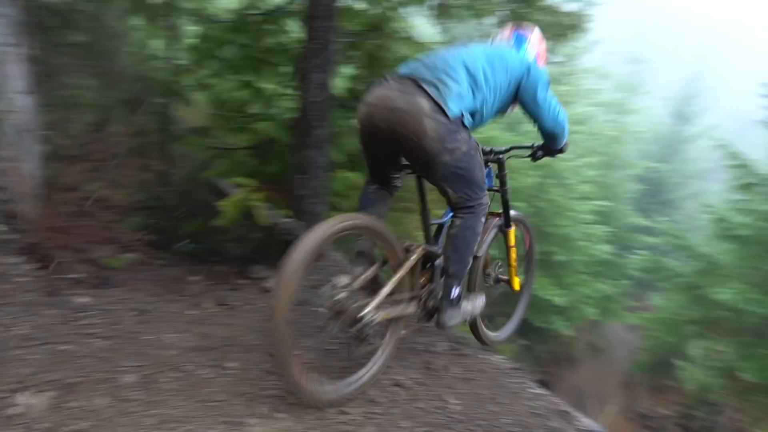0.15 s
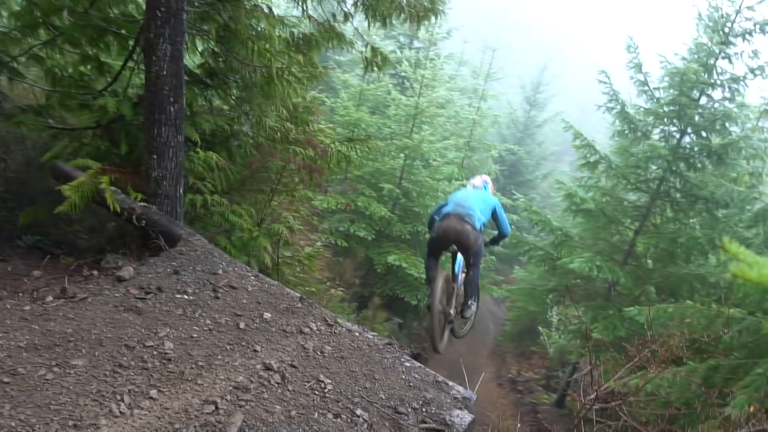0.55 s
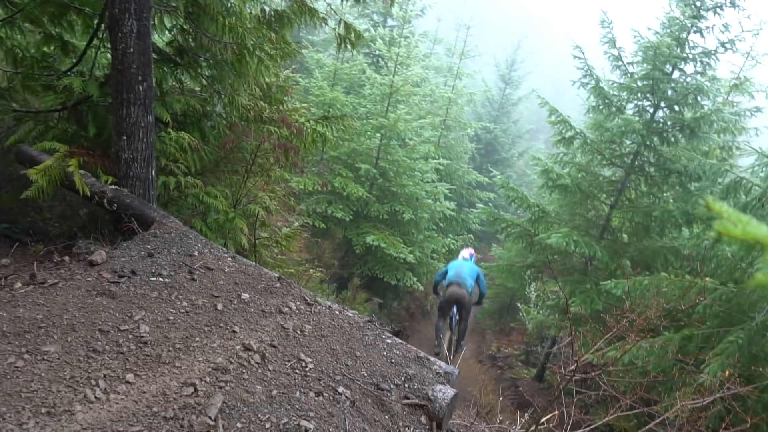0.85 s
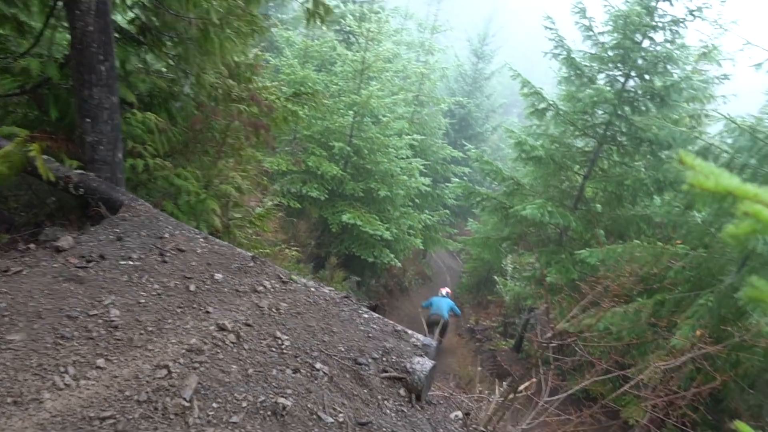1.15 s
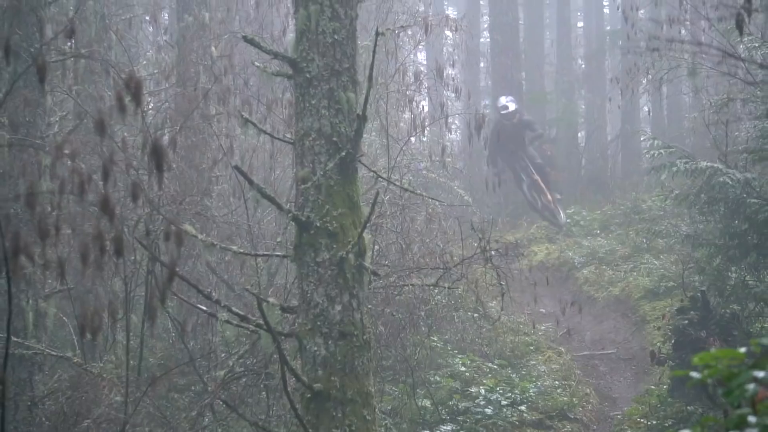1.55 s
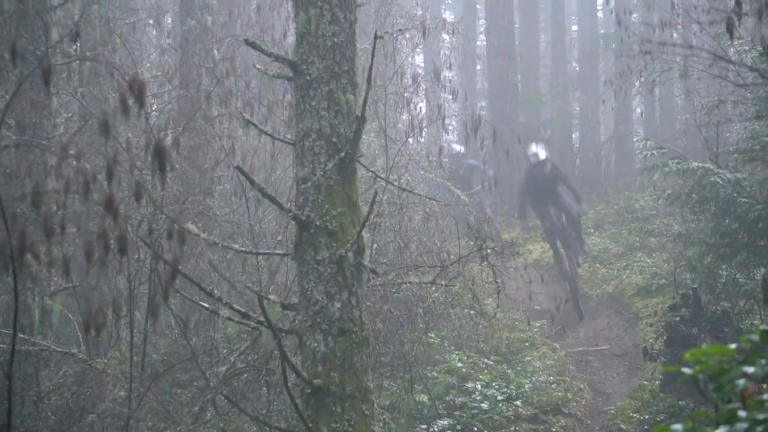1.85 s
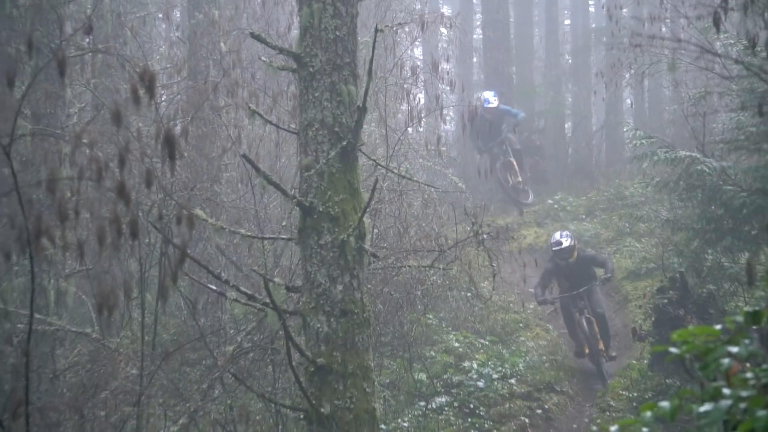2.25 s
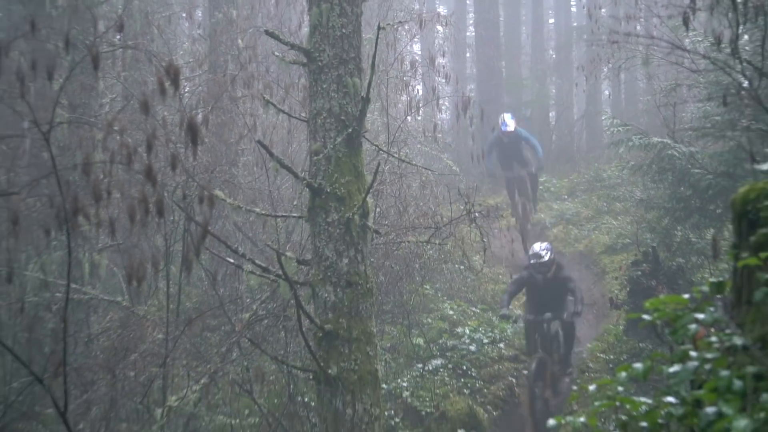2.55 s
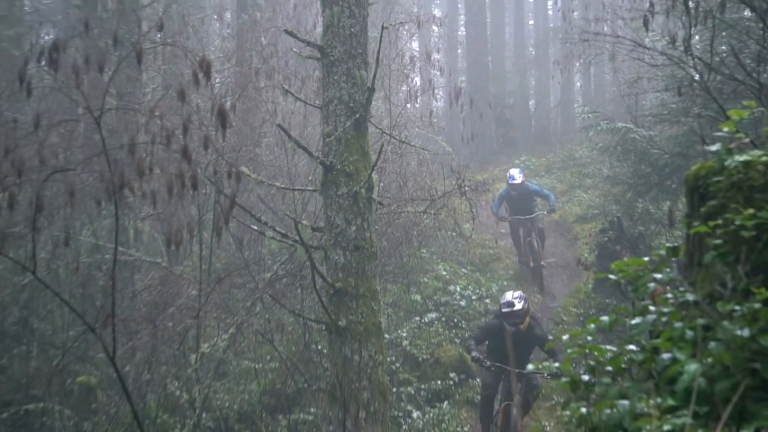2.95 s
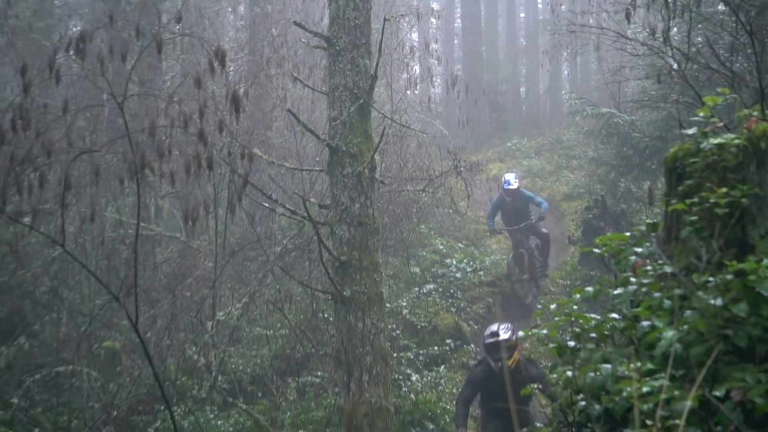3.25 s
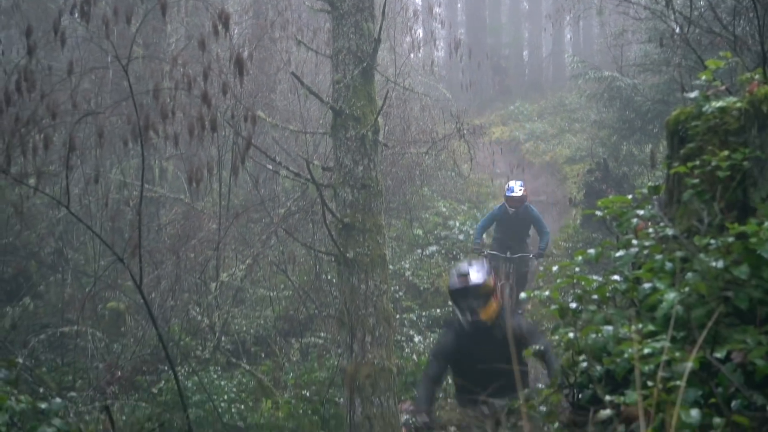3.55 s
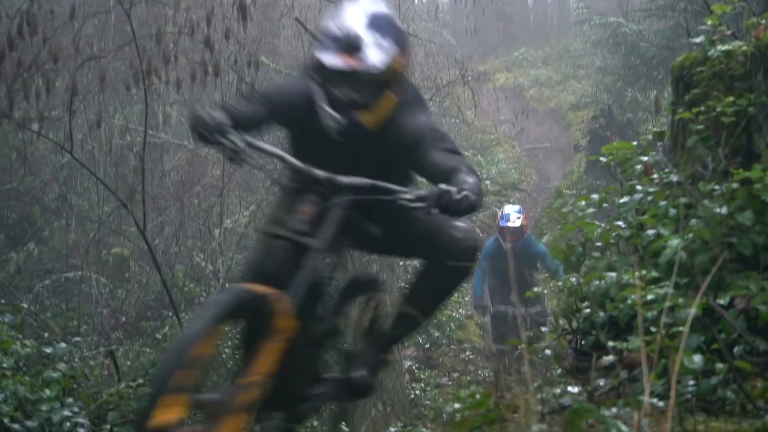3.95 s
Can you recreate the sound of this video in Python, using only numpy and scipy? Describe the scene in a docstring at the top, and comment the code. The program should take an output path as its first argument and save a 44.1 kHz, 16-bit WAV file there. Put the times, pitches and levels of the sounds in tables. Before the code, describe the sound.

On a wet forest trail, a close burst of tyre noise gives way to the ratcheting buzz of a coasting mountain bike in the air. The wheels land with a knock and a patter of earth. After a brief lull, two bikes approach with gritty, muddy rolling, low thuds and irregular chain rattles that echo briefly. Their high freehub whirr swells in spells as they near the microphone.

```python
"""A wet forest trail with mountain bikes. One rolls past, leaves a jump with its freehub buzzing and
lands, wheel after wheel. Then two riders come down a muddy track toward the microphone: knobbly tyres
scrub mud and crunch grit, wheels thud over roots, chains slap the frames, and the hubs ring louder
as they near, pawls snapping over ratchet teeth. Trunks scatter the knocks back as short echoes."""
import sys
import numpy as np
from scipy import signal
from scipy.fft import rfft, irfft, next_fast_len
from scipy.io import wavfile
from scipy.ndimage import map_coordinates

SR = 44100
rng = np.random.default_rng(int(sys.argv[2]) if len(sys.argv) > 2 else 0)


def master(y):
    """Save y as 16-bit WAV."""
    cut = np.clip(np.atleast_2d(y).T, -1, 1)
    pcm = np.round(cut * 32767)  # scale
    wavfile.write(sys.argv[1], SR, pcm.astype(np.int16))


N = 180631
TIME = np.arange(N) / SR
HZ = np.fft.rfftfreq(N, 1 / SR)
PASS_S, TAKE_OFF_S, LANDING_S = 0.023, .24, 1.172  # the first bike's cues
LIFT_S, DIG_RISE_S = 0.083, 0.021  # how long tyres take to leave the ground, and to bite into it


def gain_of(db):
    """Decibels to amplitude."""
    return 10 ** (np.asarray(db) / 20)


def unit_rms(x):
    """Scales to unit rms."""
    return x / np.sqrt(np.mean(x ** 2) + 1e-20)


def at_hz(points, hz):
    """Reads a spectrum table on a log-frequency axis."""
    f, value = np.transpose(points)
    return np.interp(np.log(hz + 1), np.log(f), value)


def curve(rows):
    """Reads a time table at every sample."""
    return np.interp(TIME, *np.transpose(rows))


def ramp(s, length):
    """Goes from 0 to 1 over a length of time centred on s."""
    return np.clip((TIME - s) / length + .5, 0, 1)


def swell(s, half_length):
    """A smooth rise and fall around s."""
    return np.exp(-((TIME - s) / half_length) ** 2)


def add(mix, s, sound):
    """Mixes a sound in at time s."""
    part = mix[:, max(round(s * SR), 0):][:, :sound.shape[-1]]
    part += sound[..., :part.shape[1]]


def colour(x, points):
    """EQ through points of frequency in Hz and gain in dB."""
    return irfft(rfft(x) * gain_of(at_hz(points, HZ)), N)


def wobble(hz):
    """Random modulation of unit rms, up to about hz."""
    return unit_rms(irfft(rfft(rng.standard_normal(N)) / (1 + (HZ / hz) ** 4), N))


def grains(per_s, wash):
    """Clicks of uneven size over a smooth wash of countless tiny ones."""
    sizes = gain_of(4 * np.minimum(rng.exponential(1, N), 3))
    clicks = sizes * (rng.random(N) < per_s / SR)
    return unit_rms(clicks * rng.uniform(-0.82, 1, (2, N))) + wash * rng.standard_normal((2, N))


def resonate(x, rings, wander_hz):
    """Steep resonances of a turning wheel, each drifting at random in pitch; unit rms."""
    size = next_fast_len(N)
    spectrum, f, out = np.fft.fft(x, size), np.fft.fftfreq(size, 1 / SR), 0
    for hz, width, db in rings:
        band = np.fft.ifft(spectrum * gain_of(db) / (1 + (2 * (f - hz) / width) ** 4))[:, :N]
        drift = np.interp(TIME, np.linspace(0, TIME[-1], 60), rng.standard_normal(60))
        out = out + (band * np.exp(2j * np.pi * np.cumsum(wander_hz * drift) / SR)).real
    return unit_rms(out)


def crossfade():
    """0 while the first bike is heard, 1 for the two riders."""
    return ramp(1.452, length=.02)


def first_bike_gain(closest_m=0.86, speed_m_per_s=10.46):
    """One over the distance of the bike that passes and flies off."""
    return (1 - crossfade()) / np.hypot(closest_m, speed_m_per_s * (TIME - PASS_S))


def riders_gain():
    """One over the distance of the two riders coming down."""
    # Their approach. Each row: time in seconds, distance in metres.
    approach = [(1.65, 34.7), (2.3, 12.1), (2.7, 16.2), (3.3, 10.5), (4.05, 7.6)]
    return crossfade() / curve(approach)


def spread(pair):
    """Two unrelated signals become left and right: near mono in the bass, wide in the treble."""
    # Stereo width. Each row: frequency in Hz, correlation of left and right.
    likeness = [(60, .999), (250, .97), (600, .89), (1400, .83), (3100, .62), (6800, .47), (15000, .44)]
    # Stereo balance. Each row: frequency in Hz, left minus right in dB.
    balance = [(600, 0), (1300, -1.5), (2400, -1.7), (5000, -1.2), (15000, -2.8)]
    mid, side = rfft(pair)
    same, lean = np.clip(at_hz(likeness, HZ), -1, 1), gain_of(at_hz(balance, HZ) / 2)
    side = side * np.sqrt((1 - same) / (1 + same))
    return irfft(np.array([(mid + side) * lean, (mid - side) / lean]), N)


def forest(x):
    """Trunks scatter the sound back as sparse echoes, the top end dying first."""
    # Decay among the trees. Each row: frequency in Hz, t60 in seconds.
    decay = [(100, 0.35), (500, 0.97), (2000, 0.39), (5000, 0.8), (15000, 0.2)]
    taps = rng.standard_normal((2, SR)) * (rng.random((2, SR)) < 2500 / SR)
    hz, t, bands = signal.stft(taps, SR, nperseg=256)
    envelope = gain_of(-60 * t / at_hz(decay, hz)[:, None]) * (1 - np.exp(-t / 0.0018))
    tail = signal.istft(bands * envelope, SR, nperseg=256)[1]
    return signal.fftconvolve(x[:1], tail / np.linalg.norm(tail[0]), axes=1)[:, :N]


def draught(arrives_s=.25, rise_db_per_s=165, fall_db_per_s=75):
    """The air dragged behind the first rider flutters on the microphone, then settles."""
    level_db = -39.5 - np.maximum(rise_db_per_s * (arrives_s - TIME), fall_db_per_s * (TIME - arrives_s))
    flutter_hz = 31 + 4 * wobble(hz=17)
    return gain_of(level_db) * np.sin(2 * np.pi * np.cumsum(flutter_hz) / SR)


def spray():
    """Crumbs of earth fly off the wheels at take-off and landing, and patter into the brush."""
    # The patter's EQ. Each row: frequency in Hz, gain in dB.
    patter_eq = [(600, -33), (2000, 0), (3800, 2.5), (5600, 3.5), (7500, -4.5), (11000, -9.5), (15500, -10)]
    thinning = gain_of(-3 * ramp(TAKE_OFF_S + 0.086, length=.15))
    trailing = gain_of(-35.5) * first_bike_gain() * ramp(0.094, length=.15) * thinning
    landing = gain_of(-35) * ramp(LANDING_S, DIG_RISE_S) * swell(LANDING_S, 0.27) * (1 - crossfade())
    return unit_rms(colour(grains(per_s=6900, wash=2.7), patter_eq)) * np.hypot(trailing, landing)


def thuds(earth_hz=68.7):
    """A wheel hits the ground: the earth gives a low thud and the tyre casing rings."""
    # Wheel strikes. Each row: start in seconds, thud level in dB, casing ring against the thud in dB.
    strikes = [(1.083, -33.5, -17), (1.125, -25.5, -5.5), (1.171, -32, 13.5), (1.192, -37, 3),
               (1.431, -48, 3.5), (2.107, -33, -12), (2.206, -36, -10), (2.871, -22.5, -16),
               (2.986, -31.5, -6), (3.086, -28, -4.5), (3.329, -29, 0), (3.578, -25, -22),
               (3.8, -36, -14.5), (3.923, -34.5, 0.5)]
    # The air-filled tyre's modes. Each row: frequency in Hz, level in dB, t60 in seconds.
    modes = [(182, 0.5, 0.04), (245.5, 8.5, 0.019), (260, -13, 0.052)]
    out, t = np.zeros((2, N)), np.arange(8192) / SR
    for s, level_db, casing_db in strikes:
        earth = np.sin(2 * np.pi * earth_hz * t) * (t / 0.0061) * np.exp(1 - t / 0.0062)
        casing = sum(gain_of(db - 60 * t / t60) * np.sin(2 * np.pi * hz * rng.uniform(0.9, 1.05) * t)
                     for hz, db, t60 in modes)
        casing *= 0.93 * gain_of(casing_db) * (1 - np.exp(-t / 0.0015))
        add(out, s, gain_of(level_db) * (earth + casing))
    return out


def frame_ring(t):
    """One strike's ringing of wheel and frame; no two strikes stir quite the same pitches."""
    # The bike's modes. Each row: frequency in Hz, level in dB, t60 in seconds.
    modes = [(1100, -14.5, 0.021), (1450, -3, 0.026), (1620, -4.5, 0.028), (1990, 6, 0.014),
             (2188, -4.5, 0.036), (2720, -5.5, 0.03), (3900, -6, 0.0077)]
    hz, db, t60 = np.transpose(modes)[:, :, None]
    detuned = hz * (1 + .025 * rng.standard_normal(hz.shape))
    partials = gain_of(db - 60 * t / t60) * np.sin(2 * np.pi * detuned * t)
    return (partials * rng.choice([-1, 1], hz.shape)).sum(0)


def rim_hits():
    """The tyre bottoms out and the rim hits the ground with a hard, hollow knock."""
    # The knocks. Each row: start in seconds, level in dB.
    knocks = [(1.17, -11), (1.175, -15.5), (1.179, -12), (2.210, -30), (2.85, -19), (4.017, -34)]
    out, t = np.zeros((2, N)), np.arange(2048) / SR
    for s, level_db in knocks:
        ring = np.array([frame_ring(t), frame_ring(t)])
        add(out, s, gain_of(level_db) * ring / abs(ring[0]).max())
    return out


def chain_slaps(rattle_s=.017, ticks_per_s=900):
    """The chain strikes the frame, then chatters against it in a short dense burst."""
    # The slaps. Each row: start in seconds, relative level in dB, treble tilt in dB per octave.
    slaps = [(0.0112, -4.5, 9), (1.0776, -34.5, -5), (1.1231, -23, 2.5), (1.1733, -14.5, 1),
             (1.2325, -18, 2.5), (1.711, -34, -3), (2.008, -27, -2.5), (2.0957, -19, 1.5),
             (2.1167, -25.5, -4.5), (2.194, -22, -4), (2.2088, -17.5, -0.5), (2.2779, -19, -3.5),
             (2.5402, -26, 0), (2.703, -28.5, -7), (2.7566, -24, -3), (2.7901, -15.5, 4), (2.847, -20, -2),
             (2.8836, -10, 4.5), (2.9148, -15, 2.5), (2.9481, -21.5, -5), (2.9787, -19, 1.5),
             (3.037, -18, 2.5), (3.1345, -29, -4.5), (3.2813, -40, -1), (3.362, -26.5, -5), (3.674, -21, 3),
             (4.0156, -19.5, 1.5)]
    # The dry crack of chain and stones. Each row: frequency in Hz, gain in dB.
    crack_eq = [(200, -11), (700, -7.5), (1500, -1), (2800, 2.5), (4600, -2.5), (7000, -10.5), (11000, -26),
                (15500, -30)]
    cracks, rings, t = np.zeros((2, N)), np.zeros((2, N)), np.arange(4096) / SR
    octaves = np.log2(np.clip(np.fft.rfftfreq(len(t), 1 / SR), 1500, SR) / 2500)
    for s, level_db, tilt in slaps:
        ticks = rng.random(len(t)) < ticks_per_s / SR
        chatter = (ticks + .14) * rng.standard_normal((2, len(t))) * np.exp(-(t / rattle_s) ** 2)
        chatter[:, 16] = 1.2, rng.normal(0, 1)  # the opening strike
        chatter = irfft(rfft(chatter) * gain_of(tilt * octaves))
        chatter *= gain_of(level_db) / np.linalg.norm(chatter[0])
        ring = signal.fftconvolve(chatter, frame_ring(t)[None], axes=1)
        add(cracks, s, chatter)
        add(rings, s, ring / np.linalg.norm(ring[0]) * gain_of(level_db))
    return gain_of(22.0) * colour(cracks, crack_eq) + gain_of(5) * rings


def tyre_envelopes():
    """Gains of rumble, scrub and crunch: steady rolling by distance, plus each dig into the ground."""
    # Tyres dig in on a landing, bump or turn. Each row: time in seconds, crunch level in dB,
    # fade in seconds, mud scrub over the crunch in dB.
    digs = [(1.08, -46, 0.1, 1.5), (1.125, -38.5, .06, 3.5), (1.18, -39.5, 0.078, 4.5),
            (1.406, -34, 0.022, -13), (1.432, -48.5, 0.013, 8), (1.47, -59, 0.11, -8),
            (2.01, -46.5, 0.07, -3), (2.1, -46.5, 0.17, 4), (2.2, -39, 0.026, 0), (2.285, -41.5, 0.23, -7),
            (2.47, -44.5, 0.07, 3), (2.789, -36.5, 0.093, -3), (2.872, -35.5, 0.21, -2.5),
            (3.328, -40, 0.33, 5), (3.573, -35, .08, -3.5), (3.664, -35.5, 0.18, -1),
            (3.794, -40, 0.032, 0.5), (3.915, -30.5, 0.019, 0), (4.015, -33, 0.016, 5)]
    # Faders in the order rumble, scrub, crunch.
    first_db, take_off_db, riders_db = (-45.5, -37.5, -31.5), (-3, -6, -8.5), (-27.5, -26, -21)
    lifted = ramp(TAKE_OFF_S, LIFT_S)
    rolling = [gain_of(first + drop * lifted) * first_bike_gain() + gain_of(riders) * riders_gain()
               for first, drop, riders in zip(first_db, take_off_db, riders_db)]
    power = np.square(rolling)
    for s, db, fade_s, mud_db in digs:
        press = ramp(s, DIG_RISE_S) * np.exp(-np.maximum(TIME - s, 0) / fade_s)
        power += np.outer(gain_of([db + mud_db - 5.5, db + mud_db, db]), press) ** 2
    return np.sqrt(power)


def tyres():
    """Knobs churn the mud and crush grit; each bump in the ground presses harder for a moment."""
    # EQs of ground rumble, mud scrub and grit crunch. Each row: frequency in Hz, gain in dB.
    rumble_eq = [(15, -14), (28, -5), (45, 5), (70, 4), (100, 3.5), (130, 1.5), (170, -16), (260, -29),
                 (500, -31)]
    scrub_eq = [(90, -9), (150, -4.5), (215, -1), (280, 3.5), (390, -1.5), (530, -1), (900, -3.5),
                (1400, -6), (2500, -23), (6000, -42)]
    crunch_eq = [(300, -42), (900, -11.5), (1500, -1), (2100, 1), (3000, 0), (4500, -4), (6200, -8),
                 (8500, -11), (11000, -15.5), (15500, -19.5)]
    # Close up, the knobs roar in the wheel. Each row: centre in Hz, width in Hz, gain in dB.
    roar_rings = [(249, 190, 3), (605, 280, 2.5), (860, 340, 5), (1520, 610, 4)]
    bumps = wobble(hz=40.4)
    rumble_gain, scrub_gain, crunch_gain = tyre_envelopes()
    rumble = unit_rms(colour(rng.standard_normal((2, N)), rumble_eq))
    rumble *= rumble_gain * gain_of(4.0 * bumps)
    scrub = unit_rms(colour(grains(per_s=900, wash=1.48), scrub_eq))
    scrub *= scrub_gain * gain_of(1.76 * bumps)
    crunch = unit_rms(colour(grains(per_s=1500, wash=1.6), crunch_eq))
    crunch *= crunch_gain * gain_of(1.8 + 1.24 * bumps)
    passing = gain_of(-29.5) * swell(PASS_S + .004, half_length=.03)
    run_up = gain_of(-37.5) * (1 - ramp(TAKE_OFF_S - .02, LIFT_S))
    roar = resonate(grains(per_s=620, wash=0.46), roar_rings, wander_hz=29.7)
    roar *= (passing + run_up) * gain_of(bumps)
    return rumble + scrub + crunch + roar


def freehub(clicks_per_s, rings, blur, snap, wander_hz):
    """Pawls snap into the ratchet teeth; each click rings hub and wheel, with a fuzz of spoke chatter."""
    teeth = np.cumsum(clicks_per_s * (1 + .008 * wobble(hz=30))) / SR
    force = gain_of(1.5 * wobble(hz=90))
    clicks = unit_rms(np.diff(np.floor(teeth), prepend=0)) * force
    clicks = np.array([clicks, np.roll(clicks, SR // 1100)])
    bursts = unit_rms(np.exp(-(teeth % 1) / .13)) * force
    chatter = (bursts + blur) * rng.standard_normal((2, N))
    buzz = resonate(snap * clicks + chatter, rings, wander_hz)
    return buzz * gain_of(wobble(hz=12.5))  # flutters as the bike rocks


def jump_hub():
    """The jumping bike's buzz opens up once it has passed, then drops as it sinks behind the lip."""
    # Rear wheel speed. Each row: time in seconds, pawl clicks per second before the pitch slide.
    wheel_speed = [(0, 158), (.24, 190), (.33, 174), (.45, 201), (.6, 203), (.72, 195), (.82, 196),
                   (.95, 167)]
    # Hub and wheel resonances. Each row: centre in Hz, width in Hz, gain in dB.
    rings = [(1580, 610, -3), (1995, 200, 4), (2710, 710, 3.5), (3460, 540, 1), (4720, 730, 4.5),
             (6420, 760, 7), (7870, 3200, -1.5), (11170, 2900, -5), (13540, 1600, -2), (15500, 2300, -2.5)]
    # The treble wavers, then fades as the bike flies away. Each row: time in seconds, shelf gain in dB.
    shelf = [(.25, 6.5), (.65, 2.5), (1.15, 8), (1.45, -7)]
    # The pitch slides as the bike turns in the air. Each row: time in seconds, pitch ratio.
    slide = [(.15, 1.08), (.3, 1.015), (.58, 1), (.74, 1.03)]
    buzz = freehub(curve(wheel_speed), rings, blur=2.4, snap=1.04, wander_hz=45.27)
    treble = colour(buzz, [(6500, -40), (9000, -4), (12000, 0)])
    buzz += treble * (gain_of(curve(shelf)) - 1)
    playhead = np.cumsum(curve(slide))
    buzz = np.array([map_coordinates(channel, [playhead], order=3) for channel in buzz])
    lip_db = -6 * ramp(0.88, length=0.095)
    return buzz * gain_of(-27.5 + lip_db) * first_bike_gain() * ramp(.14, length=0.23)


def trail_hubs():
    """The two riders' freehubs: a thin high sizzle that swells whenever they coast."""
    # Hub and wheel resonances. Each row: centre in Hz, width in Hz, gain in dB.
    rings = [(7100, 740, -11.5), (8670, 2700, -12.5), (11170, 3100, -15), (13640, 1000, -5.5),
             (13100, 2200, -7), (15000, 1600, -14.5)]
    # Spells of coasting. Each row: middle in seconds, level in dB, half length in seconds.
    coasts = [(1.55, -52.5, 0.12), (1.84, -51, 0.017), (2.72, -49.5, 0.087), (2.946, -42, 0.073),
              (3.184, -40.5, 0.11), (3.478, -41, 0.064), (3.816, -41, 0.088), (3.985, -29, 0.0095),
              (4.06, -32, 0.13)]
    clicks_per_s = 245 * (1 + .05 * wobble(hz=2))
    sizzle = freehub(clicks_per_s, rings, blur=4.8, snap=0.82, wander_hz=130)
    coast_power = sum((gain_of(db) * swell(s, half_length)) ** 2 for s, db, half_length in coasts)
    return sizzle * np.sqrt((gain_of(-27.5) * riders_gain()) ** 2 + coast_power)


def scene():
    """The bikes among the trees: the first crosses left to right, the two riders stay near the centre."""
    rattle, wheels = chain_slaps() + rim_hits(), thuds()
    echoes = forest(gain_of(-8.5) * rattle + gain_of(-8) * wheels)
    bikes = spread(tyres() + spray() + jump_hub() + trail_hubs() + rattle + echoes)
    crossing_db = curve([(0, 2.2), (.55, -1.6)])  # left minus right
    pan_db = crossing_db * (1 - crossfade()) - .3 * crossfade()
    bass = colour(bikes, [(120, 0), (500, -30)])  # the bass stays in the middle
    return (bikes - bass) * gain_of(np.outer([.5, -.5], pan_db)) + bass + wheels + draught()


def record(dry):
    """A steep low-pass trims the very top."""
    lowpass = signal.firwin(801, 15720, window=("kaiser", 9), fs=SR)
    return signal.oaconvolve(dry, lowpass[None], "same")


dry = scene()
out = record(dry)
master(out)
```